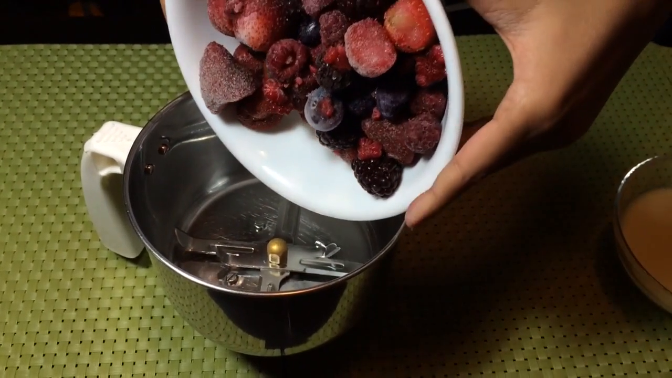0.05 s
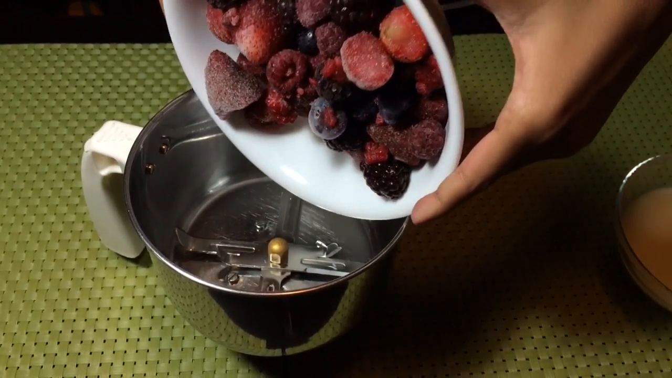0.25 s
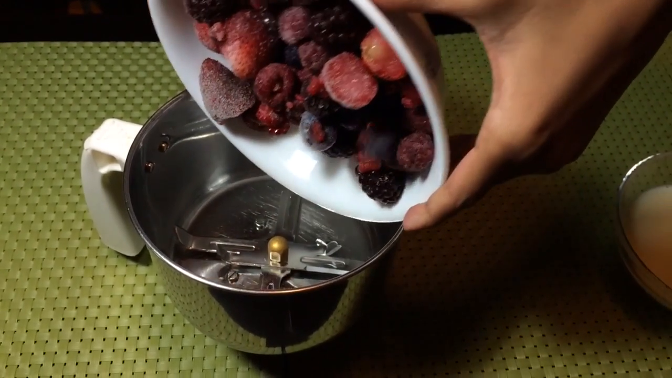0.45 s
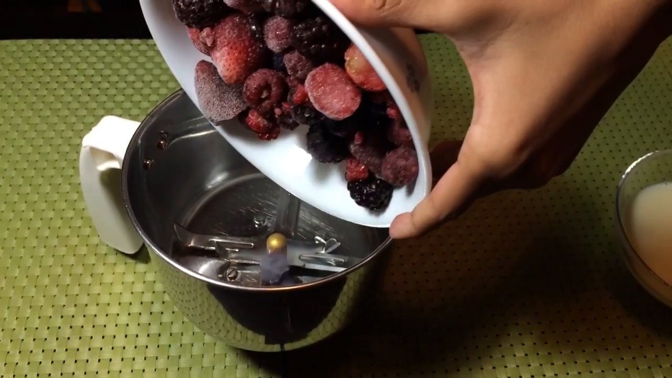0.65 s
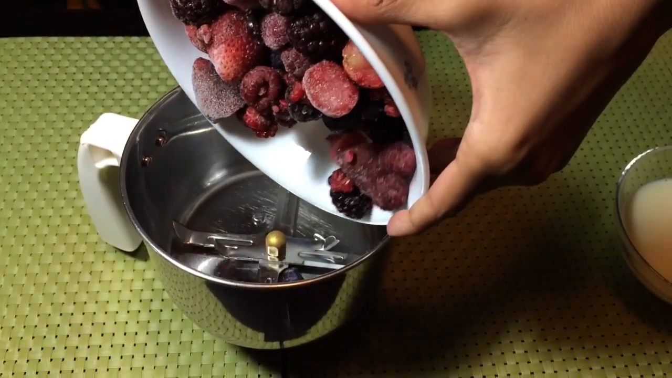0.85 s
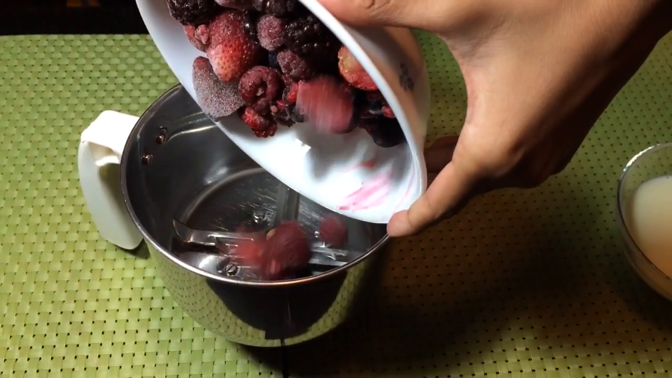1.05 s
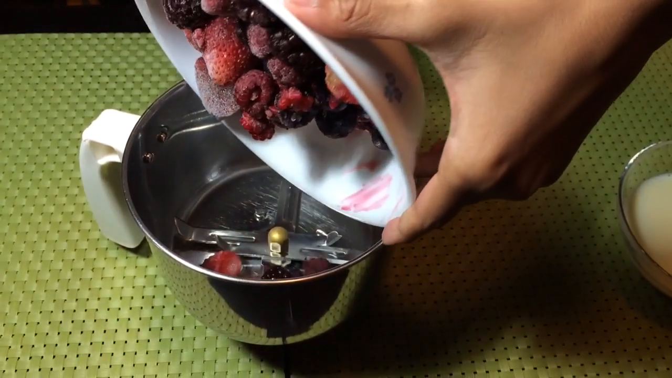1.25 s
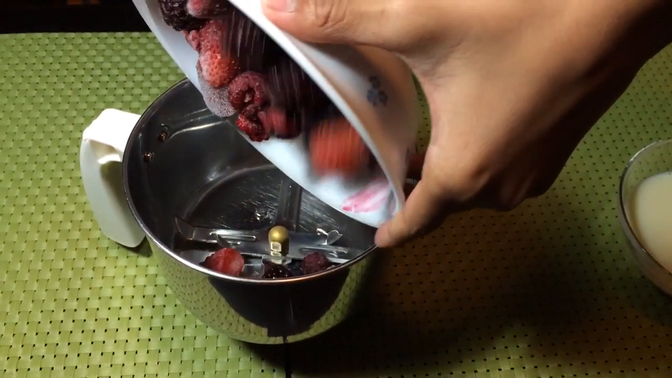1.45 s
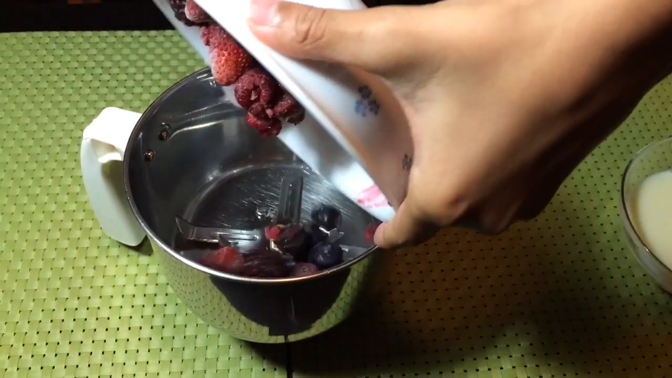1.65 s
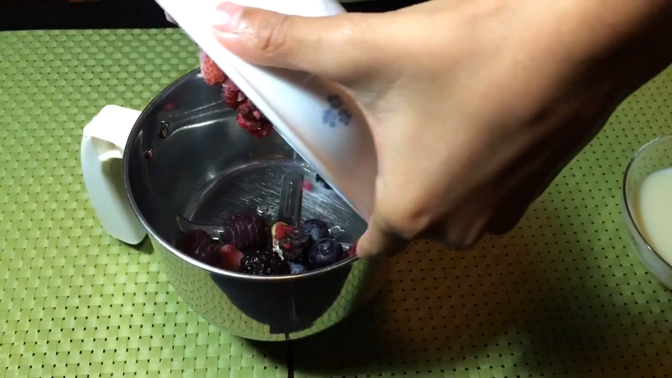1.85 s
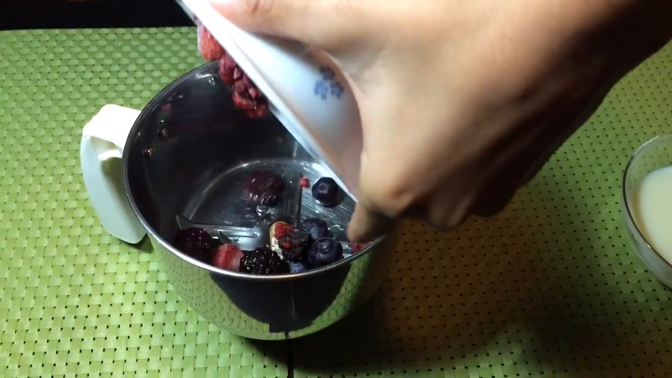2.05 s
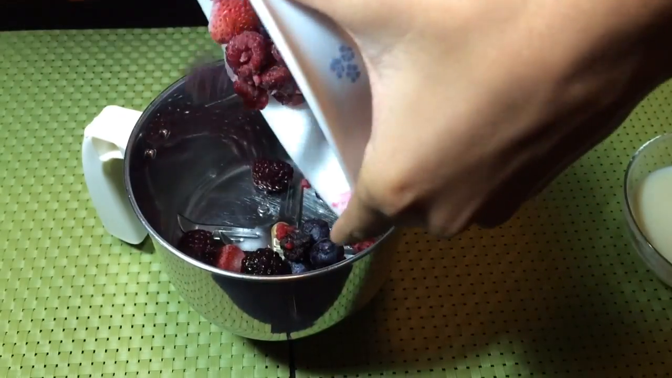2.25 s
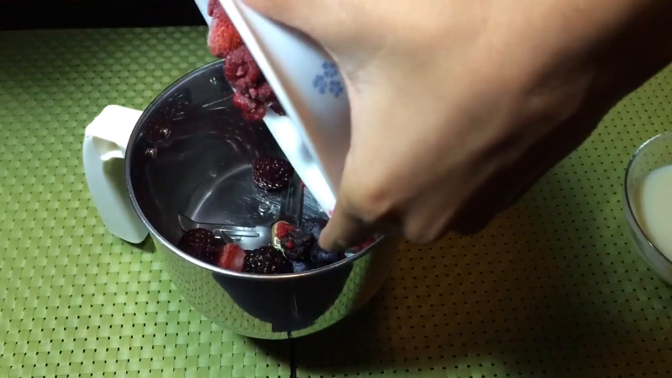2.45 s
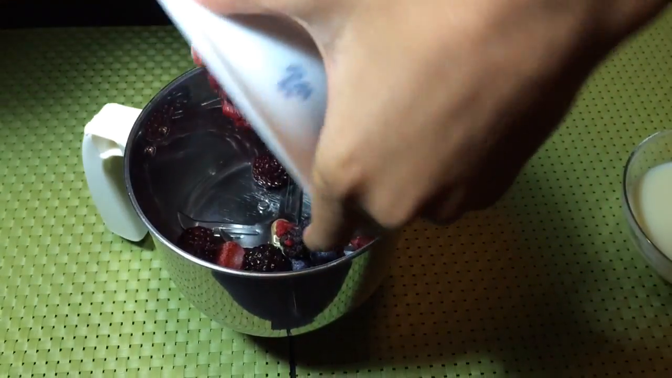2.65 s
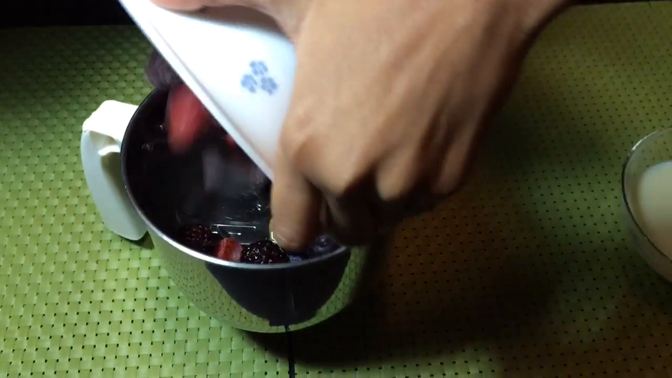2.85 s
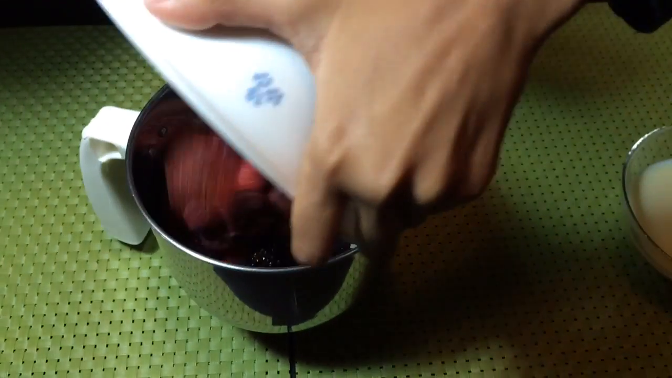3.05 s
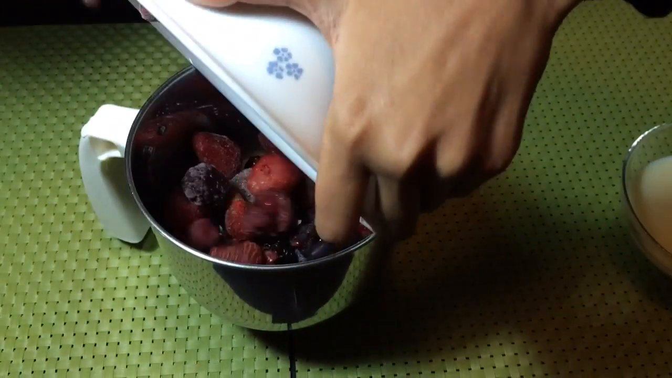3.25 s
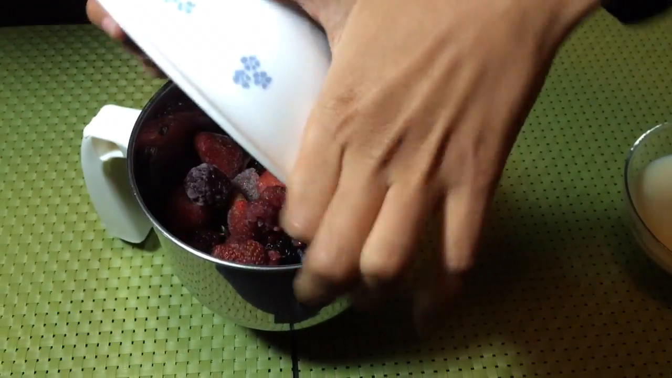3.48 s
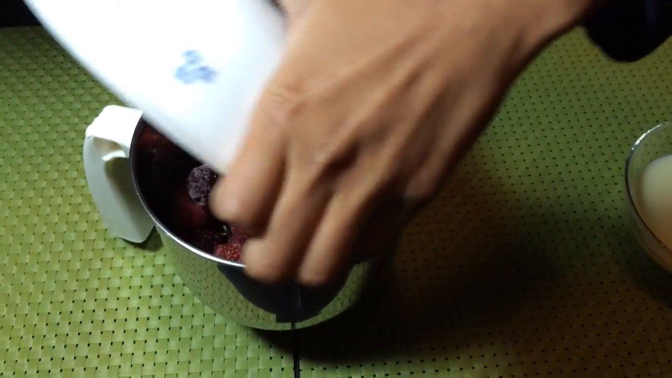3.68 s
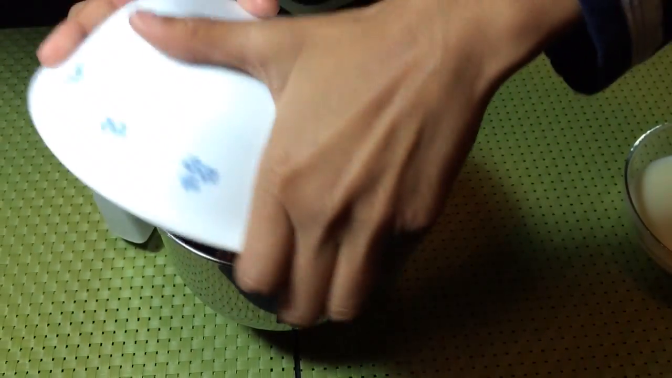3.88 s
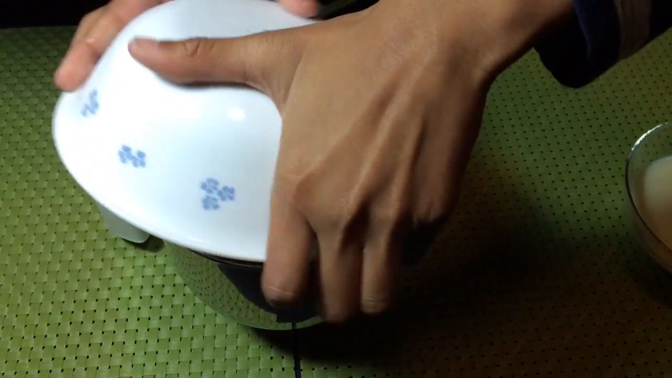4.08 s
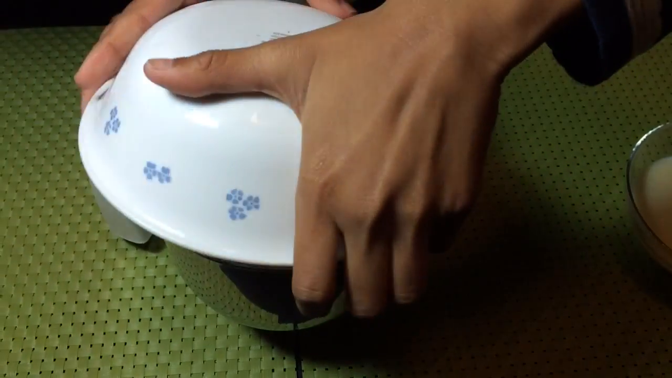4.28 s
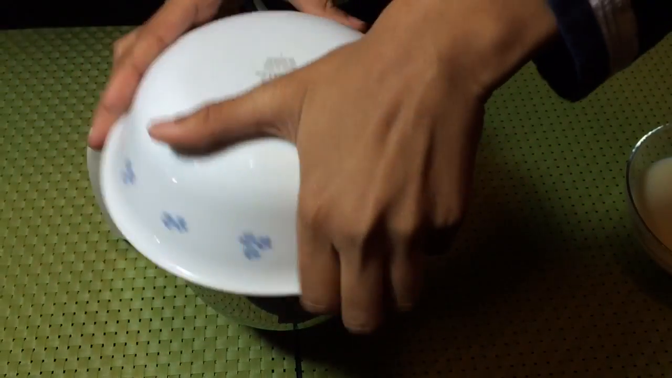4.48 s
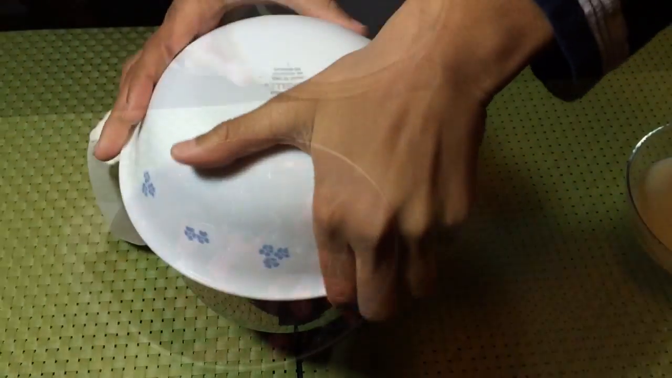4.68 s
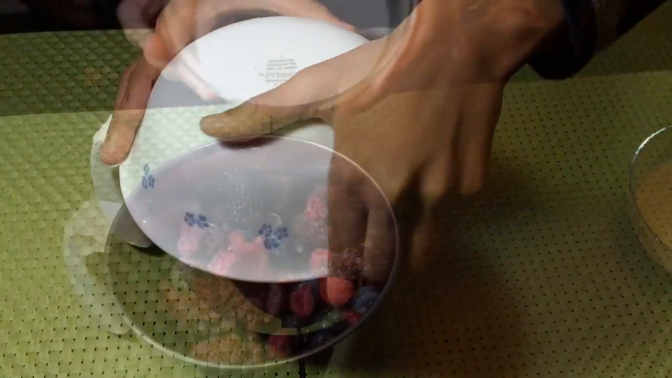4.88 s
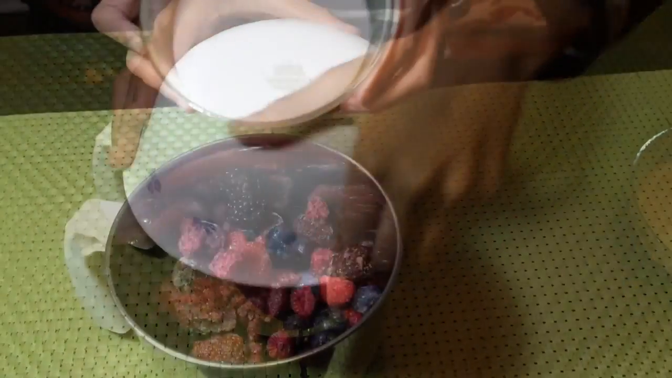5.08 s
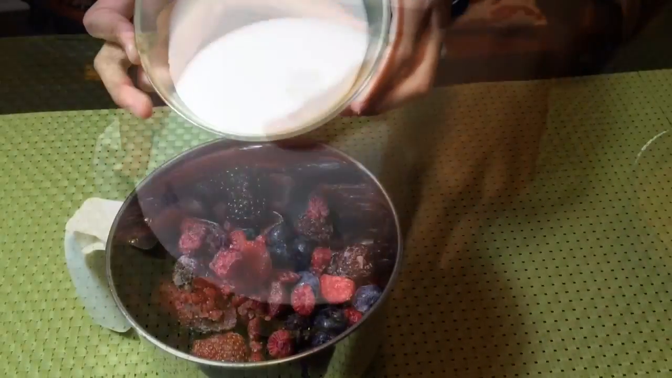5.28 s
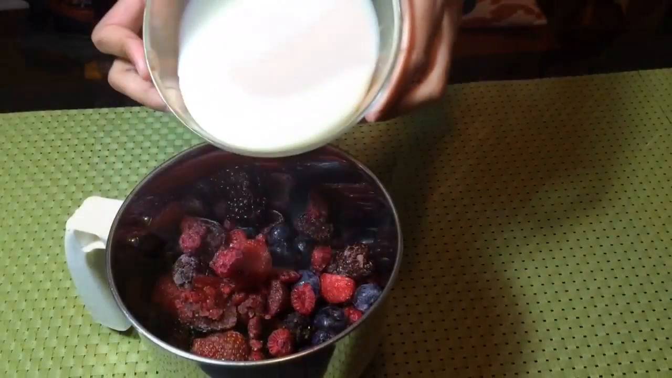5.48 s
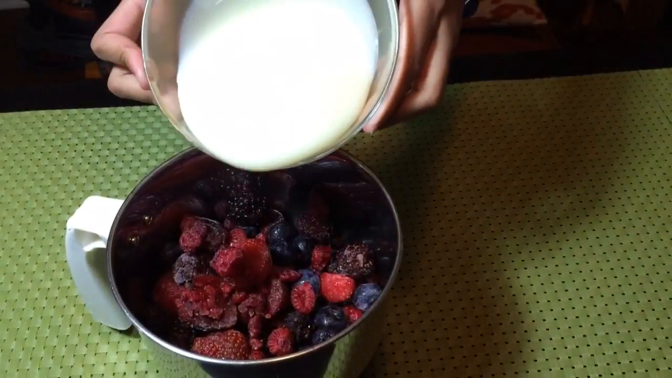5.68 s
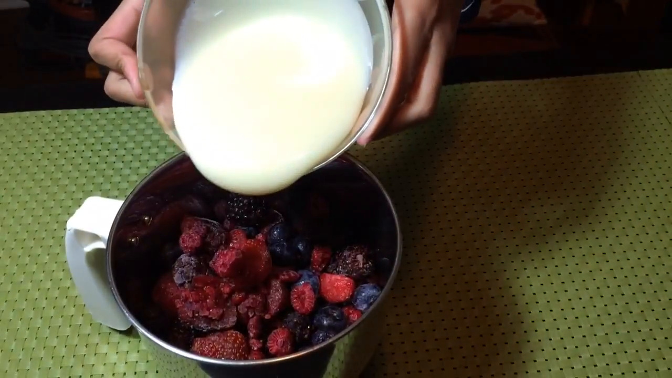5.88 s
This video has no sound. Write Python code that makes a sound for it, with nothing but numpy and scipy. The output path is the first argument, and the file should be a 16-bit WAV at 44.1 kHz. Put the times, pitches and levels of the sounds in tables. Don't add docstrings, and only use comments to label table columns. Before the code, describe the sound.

Frozen fruit drops into a thin metal jar on a table, heard close. Single hard tap first, scattered metallic knocks, a strong clatter, a pause, then the loudest crack and tumble with a dull thump. Afterwards ceramic knocks ring on the steel rim with short scrapes, fading to soft rubbing, a faint far hiss, and low appliance drone.

```python
import sys
import numpy as np
from scipy import signal
from scipy.fft import rfft, irfft
from scipy.io import wavfile
from scipy.ndimage import uniform_filter1d

SR = 44100
rng = np.random.default_rng(int(sys.argv[2]) if len(sys.argv) > 2 else 0)


def pcm_store(signal):
    levels = np.round(np.clip(np.atleast_2d(signal), -1, 1) * 32767)
    wavfile.write(sys.argv[1], SR, levels.astype(np.int16).T)


def gain_from_db(level_db):
    decades = np.asarray(level_db, float) / 20
    return 10 ** decades


N = 261513

# (time [s], blow peak [dB], weight [dB], frost [dB], struck spot's pitch [Hz])
FIRST_FLOOR = [(0.4331, -17.5, -51, -23.5, 6440), (0.9362, -29.5, -32, -26, 2900),
               (1.013, -41.5, -39.5, -65, 1270), (1.0813, -58, -71, -37.5, 1450),
               (1.1027, -35.5, -23.5, -35, 1550), (1.166, -32.5, -40, -29.5, 1650),
               (1.2136, -40.5, -33.5, -48, 1600), (1.2398, -53.5, -30.5, -35, 4250),
               (1.3701, -34.5, -60.5, -46, 2970), (1.5594, -36, -46.5, -42.5, 1970),
               (1.7355, -23.5, -26.5, -17, 1570), (1.8012, -21.5, -32, -26.5, 1890),
               (1.8666, -54, -72, -41, 1270)]
FIRST_CORNER = [(0.695, -44, -33.5, -28, 1460), (0.7392, -39.5, -34, -28.5, 880),
                (0.9229, -39.5, -25, -36, 1620), (1.161, -23.5, -28, -60, 1040),
                (1.198, -45.5, -38, -46, 1040), (1.2542, -33.5, -33, -26.5, 6660),
                (1.3145, -35, -30.5, -58, 1620), (1.6223, -11.5, -36, -12, 2590),
                (1.6503, -30.5, -30, -39, 1570), (1.6684, -25, -27, -35.5, 4260),
                (1.704, -35.5, -32.5, -29, 3400), (1.7233, -20, -22, -13.5, 2900),
                (1.9527, -44, -34.5, -79, 1140), (2.0444, -43, -41.5, -53, 2910)]
FIRST_WALL = [(0.7215, -41, -35, -40, 1190), (0.757, -40.5, -52, -35.5, 3300),
              (0.8178, -45, -43, -44, 2950), (0.832, -29.5, -33, -47, 1320), (0.9707, -50, -36, -34.5, 910),
              (0.9765, -40, -32, -27.5, 895), (1.0232, -49, -44.5, -40.5, 1290),
              (1.0397, -26.5, -34.5, -57, 1290), (1.0519, -55, -41.5, -45, 1220),
              (1.1228, -20.5, -20.5, -68, 1190), (1.1379, -47, -29.5, -39, 2660),
              (1.3078, -40.5, -28.5, -24.5, 2650), (1.3393, -33.5, -32, -23, 2500),
              (1.6078, -15, -20, -7, 1137), (1.7135, -27, -23, -28, 4000), (1.7841, -14, -27.5, -50, 2730),
              (1.926, -35.5, -47, -76, 1245), (2.0, -53, -39, -49.5, 870)]
CLUMP_FLOOR = [
    (2.8394, -36.5, -39.5, -41.5, 2610),
    (2.8879, -12, -18, -25, 1970),
    (3.06, -35, -33, -34, 1910),
    (3.115, -31, -30, -32.5, 1055),
    (3.2902, -50.5, -33, -53, 3150),
]
CLUMP_CORNER = [
    (2.862, -2.5, -22, -1.5, 5160),
    (2.9778, -15.5, -24, -47, 940),
    (3.0226, -26, -27.5, -55, 1320),
    (3.033, -32.5, -30, -24, 7300),
    (3.314, -44.5, -46, -41.5, 6200),
    (3.355, -48.5, -62.5, -46, 1140),
    (3.428, -56, -46.5, -50, 1176),
]
CLUMP_WALL = [
    (2.8553, -7.5, -34, -14, 2770),
    (2.8678, -8.5, -11, -42, 2170),
    (2.9945, -25, -23, -65, 970),
    (3.0081, -17, -29, -15, 1890),
    (3.04, -33, -31.5, -25.5, 1620),
    (3.136, -31, -38.5, -29.5, 1242),
    (3.1476, -34, -34, -56, 1630),
    (3.1895, -24.5, -18, -26, 1890),
    (3.3942, -54, -39, -51, 908),
]
BOWL_DOWN = [
    (3.9105, -45, -53, -62.5, 2300),
    (3.9849, -11, -32, -17.5, 1980),
    (4.0204, -31, -35, -62, 1570),
    (4.061, -33, -32, -47, 1850),
    (4.178, -49, -70.5, -45, 1860),
    (4.2891, -16.5, -40.5, -27, 2360),
    (4.5195, -22.5, -42.5, -67, 2140),
    (4.6511, -43.5, -28, -44, 6270),
    (4.8654, -39.5, -40, -68.5, 2650),
    (5.2771, -23.5, -35, -30, 2200),
]
BOWL_SLANT = [
    (2.4636, -38, -30.5, -35, 4880),
    (2.5039, -19, -35.5, -19, 2970),
    (3.9747, -48, -55, -63, 1882),
    (3.992, -14, -20.5, -18.5, 1614),
    (4.1141, -37.5, -34, -71, 1330),
    (4.702, -48.5, -48.5, -60, 1100),
    (4.8353, -22, -35.5, -35.5, 2240),
    (5.2471, -32, -50, -45, 3090),
]
BOWL_SIDE = [
    (2.4728, -35, -38.5, -13, 7400),
    (4.743, -59, -57.5, -46, 2200),
    (4.783, -23, -33.5, -32.5, 2580),
    (5.176, -49, -52, -55, 2300),
]

# (frequency [Hz], level [dB], t60 [s])
EMPTY_JAR = [(1240, 5.5, 0.027), (1670, -1.5, 0.26), (1890, -20, 0.11), (2730, 17, 0.016),
             (3564, -3, 0.094), (4270, 2.5, 0.07), (5600, -23, 0.18), (5500, -8.5, 0.1), (6400, -31, 0.174),
             (7300, -21.5, 0.11)]
LOADED_JAR = [(1040, -26.5, .06), (1320, -18, 0.18), (1870, -13.5, 0.16), (1980, -8.5, 0.16),
              (2410, -8.5, 0.042), (2470, -18.5, 0.29), (2700, -10, 0.0862), (3080, -10.5, 0.21),
              (3060, -16.5, 0.048), (4640, -10, .11), (4880, -12, 0.12), (5184, -7.5, 0.12),
              (5560, -18, .15), (7220, -8, 0.1)]
BOWL_ON_RIM = [(1620, -10, 0.38), (1929, -1, 0.21), (2047, -13, 0.24), (2300, -8.5, 0.53),
               (2460, -8.5, 0.26), (2864, -12.5, 0.3), (3740, -15, 0.072), (4580, -4.5, 0.15),
               (4850, 0.5, 0.14), (5280, -9, 0.14), (6430, -3.5, 0.15), (7400, -14, 0.073),
               (7570, -13.5, 0.11), (8400, -16, 0.19)]
# (frequency [Hz], level [dB], t60 [s])
BARE_BOOM = [(566, 9.5, 0.59), (628, 24.5, 0.082)]
EMPTY_BOOM = [(555.3, 1.8, 0.14), (626, 16.8, 0.059), (769, 2.4, 0.027)]
LOADED_BOOM = [(666, -3.5, 0.09), (714, 1, 0.073), (910, -5.5, 0.035)]
COVERED_BOOM = [(476, -6, 0.36), (610, 17.5, 0.039), (880, -10.5, 0.15)]
SHUT_BOOM = [(305.8, -1.6, 0.12), (317, 0.33, 0.092)]
TABLE = [(83, -13.5, .1), (121, 2, 0.17), (157.3, -1.5, 0.26), (201.4, -5, 0.27), (219, -1.5, 0.18),
         (264.4, -6, 0.19)]
# (frequency [Hz], level [dB])
FROST = [(1000, -30), (6000, -8.5), (8500, -6), (10000, -1.5), (12500, 4.5), (15000, 3.5), (20000, -20.5)]
CRACK = [(300, -25), (1200, -6), (3300, -6), (4050, -10.5), (4550, -7), (7600, -7.5), (9000, -13),
         (12000, -23.5)]

# (frequency [Hz], level [dB], t60 [s])
FIRST_TAP = [(1890, -5.5, 0.2), (2380, -7, 0.14), (4470, -19, 0.32), (4800, -16, 0.37), (5566, -16, 0.2),
             (6540, -10, 0.13), (7300, -4, 0.13)]
HEAP_LANDS = [(1126, -15.5, 0.094), (1680, -16, 0.22), (2200, -17, 0.1), (2650, 5, 0.045), (3230, 0, 0.062),
              (4390, -4.5, 0.06), (4740, -16, 0.2), (5453, 4, 0.1), (6560, -13, 0.12), (7494, -19.5, 0.15),
              (8570, -11, 0.046)]
HEAP_ROLLS = [(1620, -10, 0.087), (2850, 0, 0.025), (4920, -4.5, 0.074), (5530, -0.5, 0.029)]
LAST_TAP = [(1110, -4, 0.067), (1900, -11, 5.0), (2412, -5, 0.1), (5500, -10, 0.069), (7940, -11, 0.13)]
RIM_TOUCH = [(1650, -17, 0.15), (1840, -7, 0.2), (2010, -7.5, 0.21), (2390, 1.5, 0.089), (3000, -12, 0.18),
             (4823, -14, 0.4), (7530, -6, 0.084)]
CLUMP_LANDS = [(1362, -20, 0.23), (1970, -3, 0.13), (2340, -5.5, 0.12), (2788, 0, 0.071), (4550, -4, 0.13),
               (5150, -11.5, 0.14), (5360, -18, 0.26), (7200, -18, 0.13), (7200, -15, 0.13),
               (7962, -20, 0.17), (8000, -11.5, 0.079), (3300, -11.5, 0.15)]
CLUMP_SPLITS = [(3800, -4, 0.03), (6900, -1, 0.04), (7300, 10, 0.04), (8230, 11, 0.04)]
BOWL_LANDS = [(1593, -6, 0.54), (1885, -0.5, 0.25), (2360, -17, 0.21), (2850, -10, 0.56), (4220, -14, 0.43),
              (4716, -22, 0.34), (4823, -8, 0.1116), (5560, -15, 0.28), (6450, 1.5, 0.15), (7070, -1, 0.17),
              (8500, -10.5, 0.16)]
BOWL_TIPS = [(1860, -7, 0.22), (2309, -15.5, 0.26), (2520, -6, 0.24), (2826, -13, 0.57), (2950, -5, 0.11),
             (4554, -11, 0.37), (4900, -1.5, 0.23), (5640, -11, 0.29), (6010, 2.5, 0.057),
             (7262, -20, 0.21), (8200, -1, 0.13)]
BOWL_SHUTS = [(2268, 0.5, 0.083), (2751, 2, 0.081), (3500, -17, 0.23), (4900, -5.5, 0.06),
              (5400, -11, 0.16), (6600, -8, 0.05)]
BOWL_NUDGE = [(1630, -11.5, 0.4), (3600, 1, 0.07), (5680, -7.5, 0.15), (6700, -9.5, 0.086),
              (2400, -3.5, 0.12), (8700, -13, 0.29)]
BOWL_LIFTS = [(1400, -16, 0.17), (2150, -10, 0.14), (3483, -21, 0.45), (4400, -11, 0.22), (4610, -4, 0.19),
              (6595, -12, 0.11), (7300, -5, 0.081), (7526, -3, 0.051), (8800, -11, 0.15)]
# (time [s], peak [dB], modes)
SINGING = [(0.4345, -35, FIRST_TAP), (1.6221, -11.5, HEAP_LANDS), (1.7273, -15.5, HEAP_ROLLS),
           (1.8006, -34, LAST_TAP), (2.505, -22.5, RIM_TOUCH), (2.8636, -5, CLUMP_LANDS),
           (3.008, -18, CLUMP_SPLITS), (3.986, -22.5, BOWL_LANDS), (4.2896, -21.5, BOWL_TIPS),
           (4.836, -27.5, BOWL_SHUTS), (5.176, -49.5, BOWL_NUDGE), (5.278, -31, BOWL_LIFTS),
           (0.434, -37.5, [(113, 2, 0.22), (860, -6, 0.026)]), (0.9364, -17.5, [(3520, -2, 0.018),
         (4730, 3, 0.0084)]), (1.608, -17.5, [(706, -2, 0.038), (1700, -0.5, 0.028), (5453, -10, 0.13)]),
         (1.7843, -15.5, [(1300, 0, 0.011)]), (2.862, -25, [(72, 1, 0.17), (128.5, -2.5, 0.32)]),
         (3.19, -27.5, [(106, -2.5, 0.28), (142, -2.5, 0.13), (698, -1, 0.19), (5600, -1, .03)]),
         (4.522, -31.5, [(910, -1.5, 0.042), (1407, 2, 0.044)]), (4.784, -26, [(1250, 0, 0.036),
         (6530, 4.5, 0.038), (373, -3, 0.055)]), (4.835, -24.5, [(1765, -9, 0.039), (3690, 3, 0.026)]),
         (1.561, -40, [(1900, 1, .07), (5420, -7.5, .06)]), (3.9941, -25, [(1100, 0, 0.036)]),
         (1.2555, -34.5, [(6600, 0, 0.077), (8350, 3, .04), (1750, -3, 0.12), (4400, -14, .15)]),
         (4.5298, -30, [(2790, -2.5, 0.055), (1580, -1, 0.025)])]

# (strongest [s], half length [s], level [dB], sheen [dB], squeak [Hz])
SLIDES = [(0.575, 0.12, -66, -62, 1739), (1.685, 0.073, -42.5, -53, 2518), (2.93, 0.065, -41.5, -57, 2505),
          (3.29, 0.064, -58.5, -60, 1904), (3.535, 0.032, -45, -51, 1980), (3.59, 0.085, -53, -61, 1922),
          (3.667, 0.014, -57.5, -50, 1603), (4.11, 0.051, -62.5, -66, 2284), (4.2, 0.046, -56, -63, 1900),
          (4.49, 0.034, -59, -59, 2300), (4.529, 0.029, -46, -51, 1980), (4.565, 0.023, -63, -69, 2420),
          (4.635, 0.044, -55, -60, 1993), (4.78, 0.069, -59, -52.5, 1910),
          (5.195, 0.071, -67.5, -64.5, 1670), (5.27, 0.018, -53, -80, 2320)]
# (frequency [Hz], width [Hz], level [dB])
SLIDE_BODY = [(687, 40, -2.5), (1290, 90, 0), (2970, 170, -6.5), (4670, 98, -4.5), (5320, 81, -7),
              (6360, 110, -7.5), (7360, 110, -30.5), (8390, 120, -14)]
SHEEN = [(12200, 600, 1), (12700, 830, 2.5), (14370, 1200, 0)]
# (strongest [s], half length [s], level [dB],
# mode [Hz])
HANDLING = [(4.615, 0.021, -48, 477), (4.854, .035, -50.5, 314), (0.57, .06, -67, 7100),
            (5.42, 0.069, -69.5, 3800), (5.043, 0.053, -63.5, 610), (5.337, 0.018, -59, 325),
            (5.46, 0.065, -66, 625), (5.453, 0.038, -55, 238.5), (5.545, 0.054, -63, 383),
            (5.743, 0.077, -62, 632.6), (5.768, 0.043, -63.5, 240.3), (5.802, 0.068, -59.5, 514),
            (3.583, 0.032, -51, 1970), (3.674, .014, -50.5, 1564), (3.519, 0.011, -45.5, 6415),
            (3.535, .022, -57, 1300), (3.577, .03, -61, 1297), (4.504, 0.043, -58, 6313)]
# (time [s], pitch [Hz], level [dB])
TRAPPED_AIR = [
    (4.47, 567, -63),
    (4.514, 469.4, -58),
    (4.545, 538.7, -61.5),
    (4.7, 432, -62),
]

# (frequency [Hz], t60 [s])
KITCHEN_T60_S = [(100, 0.68), (700, 0.41), (2000, 0.32), (5000, 0.084), (13000, 0.031)]
# (frequency [Hz], level [dB per Hz])
HUM = [(25, -48.5), (59, -7), (123, -15.5), (206, -11), (242, -24.5), (863, -26.5), (1740, -36),
       (14800, -47)]
# (frequency [Hz], width [Hz], level [dB])
HUM_PEAKS = [(121.6, 21, -62), (181.9, 64, -73)]
# (frequency [Hz], level [dB])
EDGE = [(25, -4.5), (70, 3), (14900, -2), (15300, -5.5), (15600, -39), (17000, -51.5)]

FIRST_FRUIT_S, SHUT_S = 0.8, 4.7
DOWN_BOOM_DB, SIDE_THUMP_DB = -14.5, -7
LONGEST_T60_S, SING_RISE_S = 0.46, 0.0011
ENDS_DB, LET_GO = -15.5, 1.09
HANDLED_WIDTH_HZ = 28
DUST_DB, SHED_DB, SHED_DB_PER_DB, SHED_S = -73, -41.5, 1.76, 0.063
FAR_HISS_S, FAR_HISS_DB, FAR_FADE_DB_PER_S = 5.617, -55.5, 115
HUM_DB, ECHO_DB = -61.5, -17


def evened(x):
    return x / np.sqrt(np.mean(x ** 2) + 1e-20)


def read(points, hz):
    f, value = np.transpose(points)
    return np.interp(np.log(hz + 1), np.log(f + 1), value)


def add(mix, s, sound):
    part = mix[round(s * SR):][:len(sound)]
    part += sound[:len(part)]


def coloured(x, points):
    gain = gain_from_db(read(points, np.fft.rfftfreq(len(x), 1 / SR)))
    return irfft(rfft(x) * gain, len(x))


def rippled(points, luck, depth_db):
    hz = np.geomspace(600, 16000, len(luck))
    return np.transpose([hz, read(points, hz) + depth_db * luck])


def resonate(x, hz, width_hz):
    return signal.lfilter(*signal.iirpeak(min(hz, .45 * SR), hz / width_hz, SR), x)


def ring(modes, lift_db, luck, damping, t, loose=0.013, depth=0.18):
    hz, db, t60_s = (c[:, None] for c in np.transpose(modes))
    lift, detune, split = luck[:, :len(hz), None]
    hz = hz * (1 + loose * detune)
    beat = 1 + depth * np.cos(2 * np.pi * (0.0026 * hz * split * t))
    decay = gain_from_db(db + lift_db * lift - 60 * t / (t60_s * damping))
    x = (decay * beat * np.sin(2 * np.pi * hz * t)).sum(0)
    return x / abs(x).max()


def landings(down, slant, side):
    shares = [(down, 0, DOWN_BOOM_DB), (slant, 0, 0), (side, SIDE_THUMP_DB, 0)]
    return sorted((s, db, w + thump_db, w + boom_db, frost_db, hz)
                  for rows, thump_db, boom_db in shares
                  for s, db, w, frost_db, hz in rows)


def blow(row, wall, boom, ring_db, wash_db):
    s, peak_db, thump_db, boom_db, frost_db, spot_hz = row
    t = np.arange(SR // 4) / SR
    luck, noise = rng.standard_normal((3, 3, 20)), rng.standard_normal((3, len(t)))
    humps = rng.standard_normal((2, 40))
    hard_db = 0.33 * (peak_db + 20.5)
    icy_db = .5 * np.clip(frost_db - peak_db + 8.5, -30, 0)

    near = np.array(wall, float)
    near[:, 1] -= 2.5 * abs(np.log2(near[:, 0] / min(spot_hz, 3000)))
    chatter = (t[:2000] == 0) + 0.066 * noise[0, :2000] * np.exp(-t[:2000] / 0.0067)
    steel = signal.oaconvolve(ring(near, 2.2, luck[0], 0.31, t), chatter)[:len(t)]
    steel *= 1.4 + np.exp(-t / 0.011)

    u = t / (0.0005 + 0.8 / spot_hz)
    knock = np.sin(2 * np.pi * spot_hz * t) * u * np.exp(1 - u)
    crack = evened(coloured(noise[1], rippled(CRACK, humps[0], 1.4)))

    rattle = gain_from_db(1.0 * evened(uniform_filter1d(noise[0], 120)))
    hz = np.fft.rfftfreq(len(t), 1 / SR)
    bands = sum(gain_from_db(db) / (1 + ((hz - f) / 70) ** 2) for f, db, _ in near)
    blurred = evened(irfft(rfft(noise[0]) * bands, len(t)))
    wash = (blurred + .5 * crack) * rattle * np.exp(-t / 0.033)

    body = 1.01 * knock + gain_from_db(icy_db) * 0.48 * crack * np.exp(-t / 0.0052)
    body += gain_from_db(wash_db + hard_db) * wash
    body += gain_from_db(ring_db + hard_db) * steel / abs(steel).max()

    frost = evened(coloured(noise[2], rippled(FROST, humps[1], 3.5)))
    frost *= np.exp(-t / 0.0037) + 0.054 * rattle * np.exp(-t / 0.031)

    low = gain_from_db(thump_db + 4.0) * ring(TABLE, 5.45, luck[1], 0.36, t)
    low += gain_from_db(boom_db + 5.5) * ring(boom, 4.7, luck[2], 0.53, t, loose=0.0076)
    low *= 1 - np.exp(-t / 0.0035)
    high = gain_from_db(peak_db - 2.5) * body + gain_from_db(frost_db - 4.5) * frost
    return s, high * (1 - np.exp(-t / 0.00085)) + low


def singing(s, peak_db, modes):
    t = np.arange(SR // 3) / SR
    held = np.minimum(modes, [SR, SR, LONGEST_T60_S])
    throb = np.outer([0, 0, 1], 1.5 * np.cos(2.4 * np.arange(20) + 7 * s))
    envelope = (1 - np.exp(-t / SING_RISE_S)) * (0.75 + 0.6 * np.exp(-t / 0.014))
    return s, gain_from_db(peak_db) * ring(held, 0, throb, 0.92, t, depth=0.29) * envelope


def rim(x, blur):
    return sum(gain_from_db(db) * resonate(x, hz, blur / t60_s) * np.sqrt(t60_s) for hz, db, t60_s in BOWL_ON_RIM)


def swells(rows, t, column):
    out = np.zeros(len(t))
    for row in rows:
        u = (t - row[0]) / row[1]
        level_db = row[column] + ENDS_DB * (u * np.where(u > 0, LET_GO, 1)) ** 2
        out += gain_from_db(np.maximum(level_db, -140))
    return out


def slide_bands(slips, bands, touch):
    return evened(sum(gain_from_db(db) * g * evened(resonate(slips, hz, w)) for (hz, w, db), g in zip(bands, touch)))


def slides():
    t = np.arange(N) / SR
    clumps_db = evened(uniform_filter1d(rng.standard_normal(N), 150))
    slips_db = 2.6 * np.minimum(rng.exponential(1, N), 4) + 2 * clumps_db
    slips = rng.standard_normal(N) * gain_from_db(slips_db)
    touch = uniform_filter1d(rng.standard_normal((len(SLIDE_BODY) + len(SHEEN), N // 256 + 1)), 6)
    touch = [gain_from_db(4.0 * np.interp(t, np.arange(len(row)) * 256 / SR, evened(row))) for row in touch]

    squeak_hz = np.interp(t, *np.transpose(SLIDES)[[0, 4]])
    turn = np.exp(2j * np.pi * np.cumsum(squeak_hz) / SR)
    r = np.exp(-np.pi * 130 / SR)
    squeak = (turn * signal.lfilter([1 - r], [1, -r], slips / turn)).real

    body = slide_bands(slips, SLIDE_BODY, touch)
    body = body + 0.6 * evened(squeak) + 0.21 * evened(coloured(slips, CRACK))
    sheen = slide_bands(slips, SHEEN, touch[::-1]) + 2.0 * evened(coloured(slips, FROST))
    press = swells(SLIDES, t, column=2)
    rung = rim(press * evened(slips), 1.7)
    return press * evened(body) + gain_from_db(21.0) * rung + swells(SLIDES, t, column=3) * evened(sheen)


def crumbs(blows):
    t = np.arange(0, N + 256, 256) / SR
    s, peak_db = np.transpose(blows)[:2, :, None]
    u = np.maximum(t - s, 0) / SHED_S
    each = gain_from_db(SHED_DB + SHED_DB_PER_DB * peak_db) * u * np.exp(1 - u)
    shed = np.interp(np.arange(N) / SR, t, np.linalg.norm(each, axis=0))
    ticks = rng.standard_normal(N) * gain_from_db(0.83 * np.minimum(rng.exponential(1, N), 5))
    ticks *= rng.random(N) < 3000 / SR
    dust = coloured(ticks, [(300, -7.0), (2000, 1.0), (9000, -6), (20000, -0.5)])
    dust = gain_from_db(DUST_DB) * (np.arange(N) > s[0] * SR) * evened(dust)
    chips = shed * (evened(coloured(ticks, CRACK)) + 0.26 * evened(coloured(ticks, FROST)))
    return dust + chips + gain_from_db(22.5) * rim(chips, 3.255)


def handling():
    rub, t, w = rng.standard_normal(N), np.arange(N) / SR, HANDLED_WIDTH_HZ
    out = np.zeros(N)
    for row in HANDLING:
        hz = row[3]
        out += swells([row], t, column=2) * evened(resonate(resonate(rub, hz, w), hz, w))
    return out


def trapped_air():
    s, hz, level_db = np.transpose(TRAPPED_AIR)
    t = np.arange(s[0], s[-1], 1 / SR)
    waver = 1 + 1.0 * evened(uniform_filter1d(rng.standard_normal(len(t)), 600))
    tone = np.sin(2 * np.pi * np.cumsum(np.interp(t, s, hz)) / SR) * waver
    return s[0], gain_from_db(np.interp(t, s, level_db)) * evened(tone) * signal.windows.tukey(len(t), .2)


def far_hiss():
    t = np.arange(SR // 4) / SR
    air = coloured(rng.standard_normal(len(t)),
                   [(2800, -11.5), (3800, -3), (5000, -1.0), (8500, -8.0), (9800, -24.0)])
    return FAR_HISS_S, evened(air) * gain_from_db(FAR_HISS_DB - FAR_FADE_DB_PER_S * t) * np.minimum(t / 0.0037, 1)


def kitchen(x):
    out, turn = np.zeros(N), np.arange(N) / SR * 7
    for k in range(3):
        taps = np.zeros(SR // 2)
        at = np.arange(160, len(taps) - 20, 20)
        taps[at + rng.integers(0, 20, len(at))] = rng.choice([-1., 1.], len(at))
        hz, t, z = signal.stft(taps, SR, nperseg=256)
        decay = gain_from_db(-60 * t / read(KITCHEN_T60_S, hz)[:, None])
        tail = signal.istft(z * decay, SR, nperseg=256)[1]
        share = np.sqrt(2 / 3) * np.cos(turn + k * np.pi / 3)
        out += signal.fftconvolve(x * share, tail / np.linalg.norm(tail))[:N]
    return out


def hum():
    frames, hz = N // 512 + 5, np.fft.rfftfreq(2048, 1 / SR)
    a, b, patches = rng.standard_normal((frames, 1025, 3)).T
    patches = evened(uniform_filter1d(uniform_filter1d(patches, 10, 0), 8, 1))
    z = (a + 1j * b) * gain_from_db(read(HUM, hz)[:, None] + 0.66 * patches)
    room = gain_from_db(HUM_DB) * evened(signal.istft(z, nperseg=2048, noverlap=1536)[1][:N])
    noise = rng.standard_normal(N)
    drone = sum(gain_from_db(db) * evened(resonate(resonate(noise, f, w), f, w)) for f, w, db in HUM_PEAKS)
    return room + drone


def scene():
    first = landings(FIRST_FLOOR, FIRST_CORNER, FIRST_WALL)
    clump = landings(CLUMP_FLOOR, CLUMP_CORNER, CLUMP_WALL)
    bowl = landings(BOWL_DOWN, BOWL_SLANT, BOWL_SIDE)
    near = crumbs(first + clump + bowl) + slides()
    for row in first:
        boom = BARE_BOOM if row[0] < FIRST_FRUIT_S else EMPTY_BOOM
        add(near, *blow(row, EMPTY_JAR, boom, ring_db=0, wash_db=-57))
    for row in clump:
        add(near, *blow(row, LOADED_JAR, LOADED_BOOM, ring_db=-18.5, wash_db=-22.0))
    for row in bowl:
        boom = COVERED_BOOM if row[0] < SHUT_S else SHUT_BOOM
        add(near, *blow(row, BOWL_ON_RIM, boom, ring_db=-2.5, wash_db=-24.0))
    for row in SINGING:
        add(near, *singing(*row))
    add(near, 0, handling())
    add(near, *trapped_air())
    add(near, *far_hiss())
    return (near + gain_from_db(ECHO_DB) * kitchen(near) + hum())[None]


def band_limit(x):
    return signal.sosfilt(signal.butter(12, 16480, fs=SR, output="sos"), x)


def record(dry):
    held = .95 * np.tanh(dry[0] / .95)
    return band_limit(coloured(held, EDGE)[None])


dry = scene()
out = record(dry)
pcm_store(out)
```